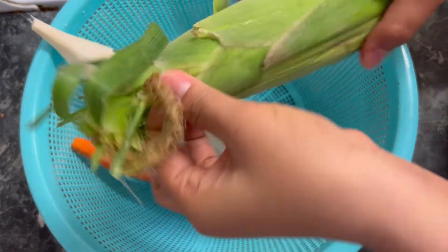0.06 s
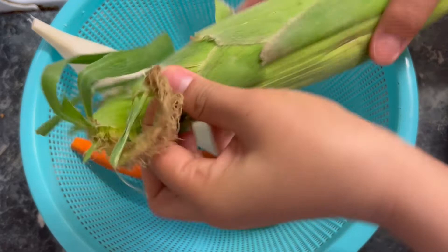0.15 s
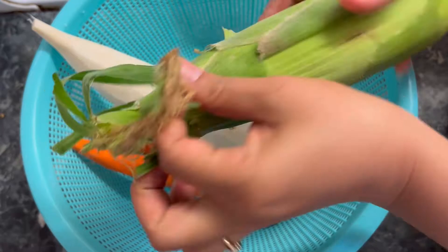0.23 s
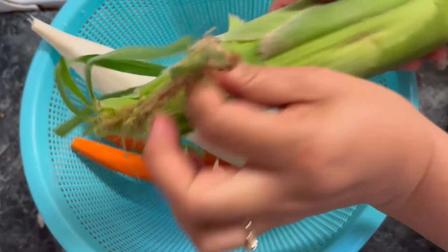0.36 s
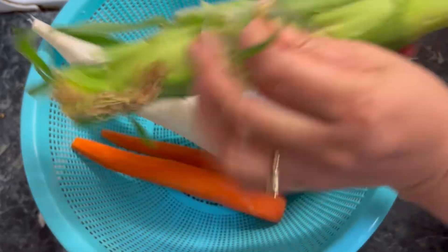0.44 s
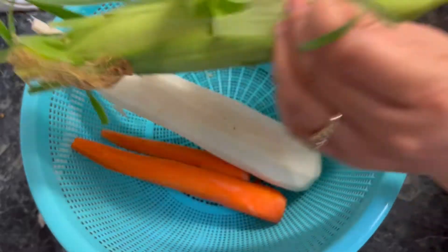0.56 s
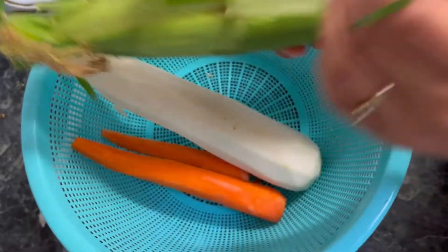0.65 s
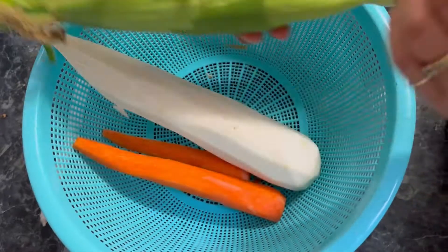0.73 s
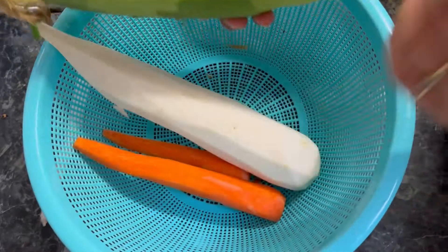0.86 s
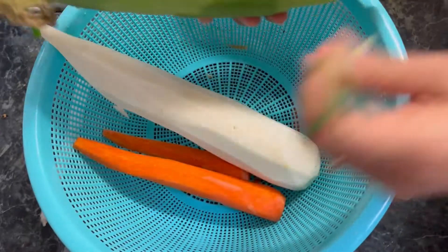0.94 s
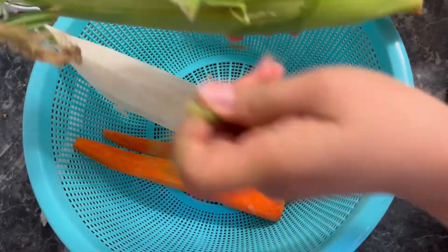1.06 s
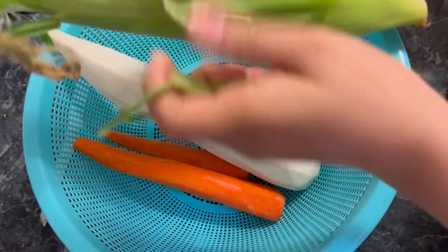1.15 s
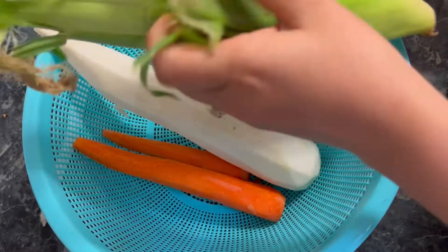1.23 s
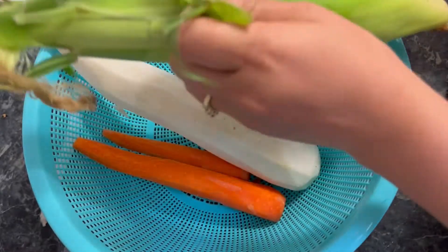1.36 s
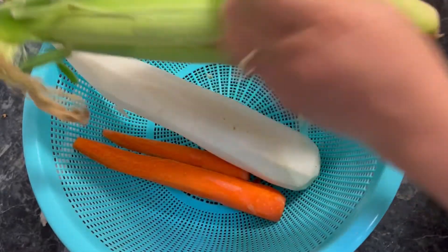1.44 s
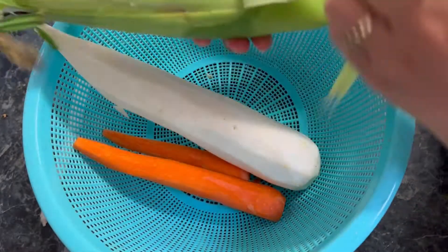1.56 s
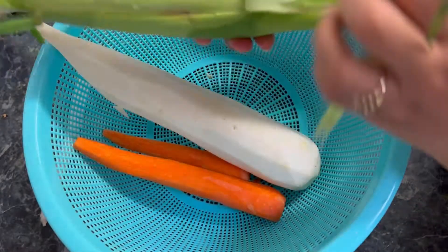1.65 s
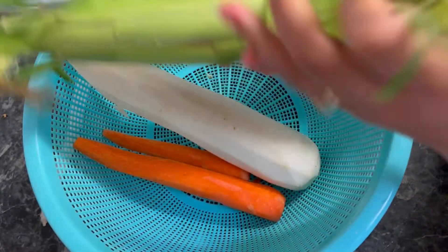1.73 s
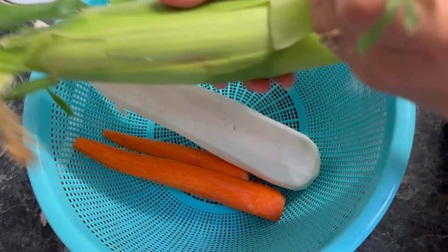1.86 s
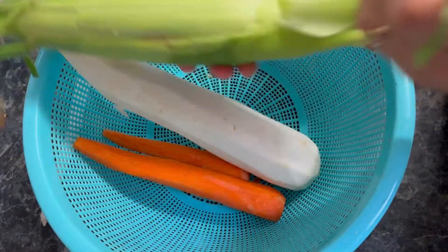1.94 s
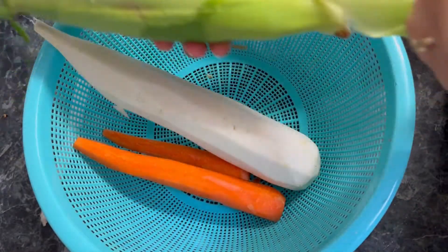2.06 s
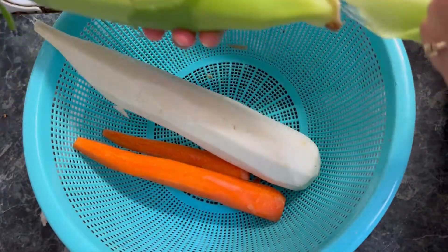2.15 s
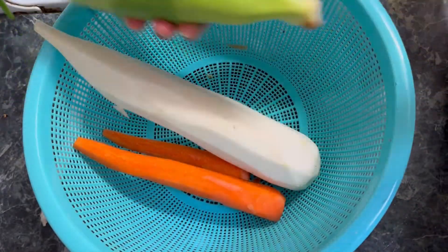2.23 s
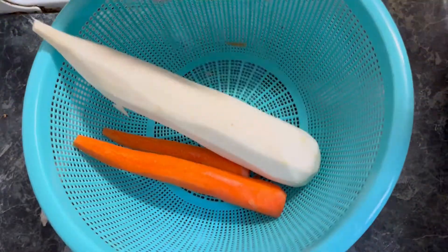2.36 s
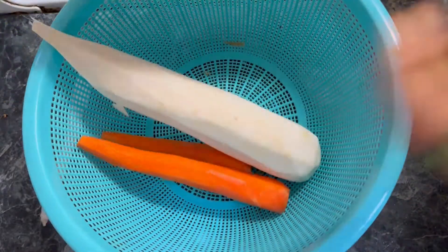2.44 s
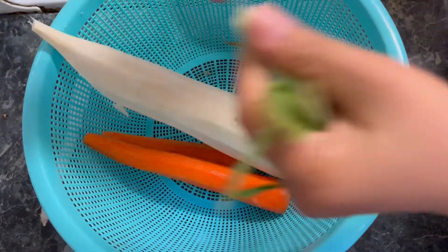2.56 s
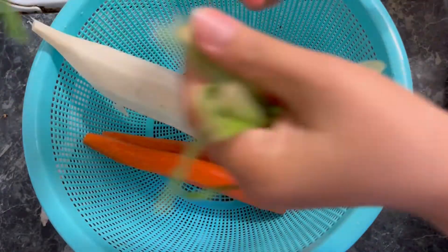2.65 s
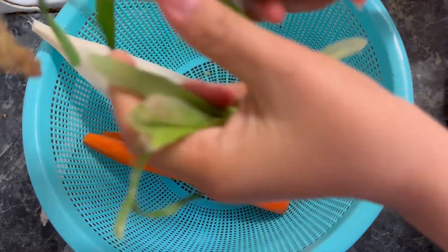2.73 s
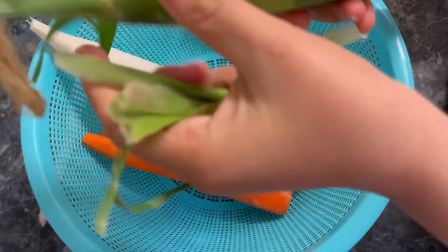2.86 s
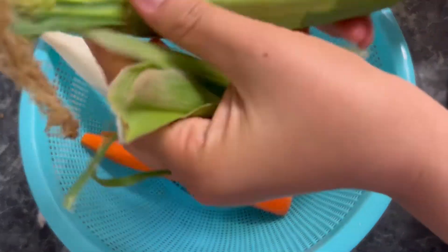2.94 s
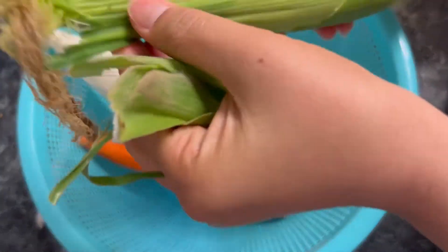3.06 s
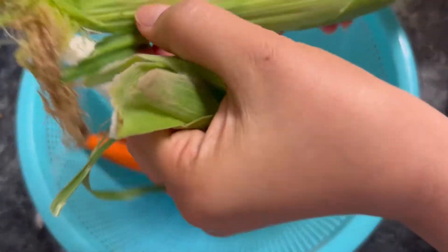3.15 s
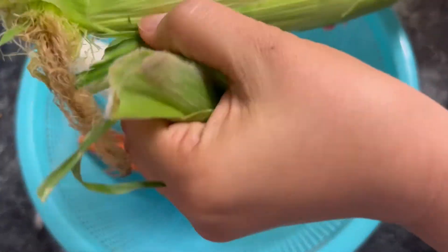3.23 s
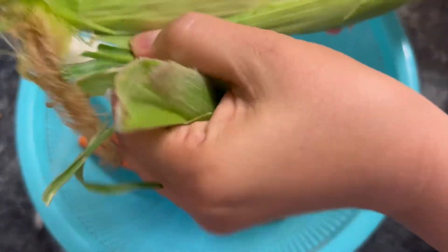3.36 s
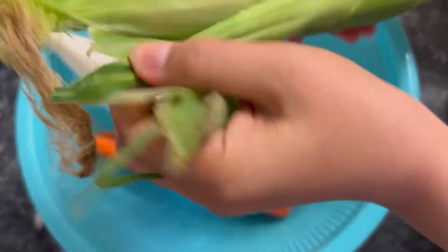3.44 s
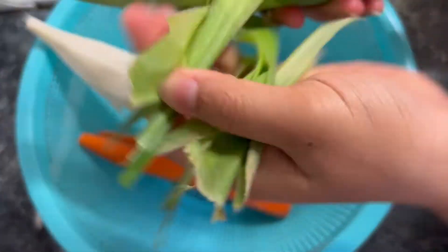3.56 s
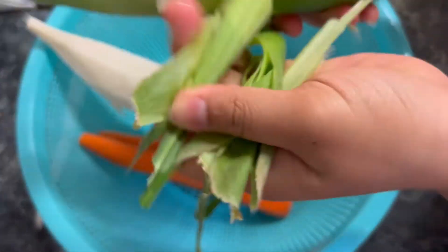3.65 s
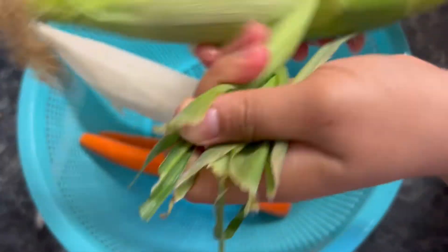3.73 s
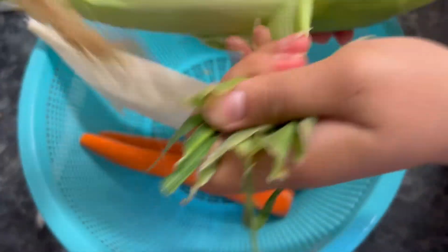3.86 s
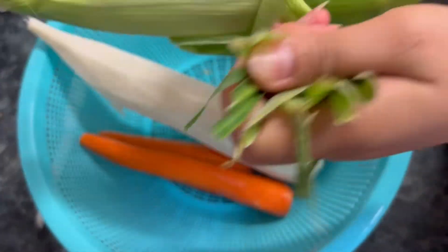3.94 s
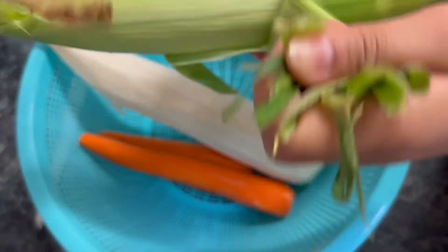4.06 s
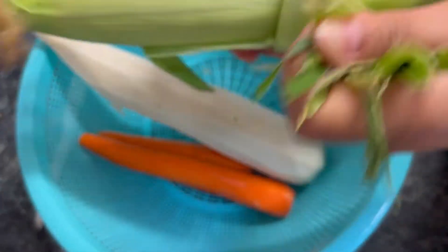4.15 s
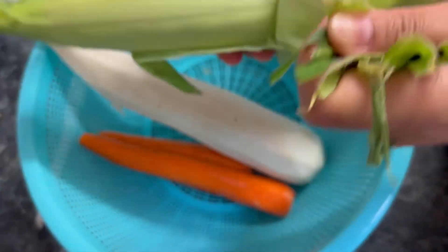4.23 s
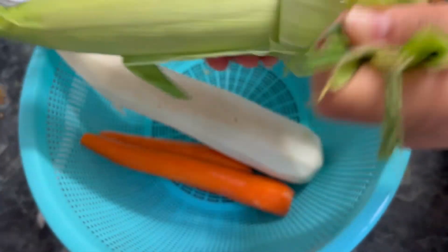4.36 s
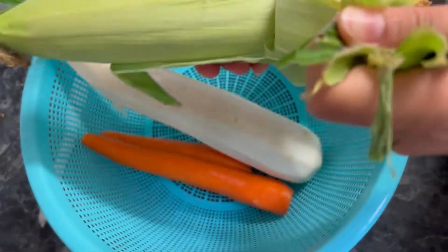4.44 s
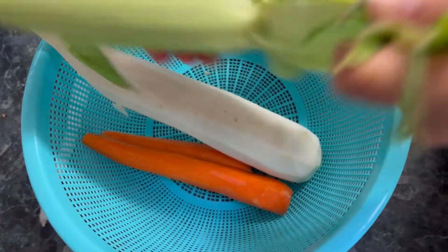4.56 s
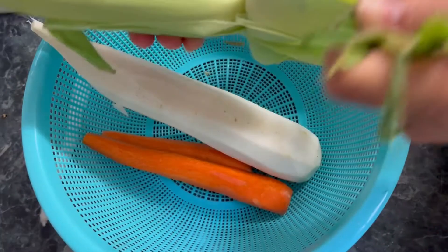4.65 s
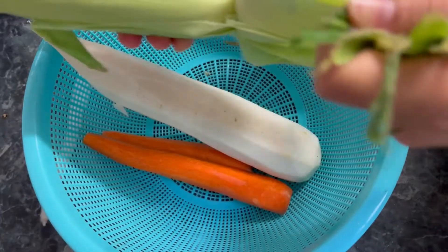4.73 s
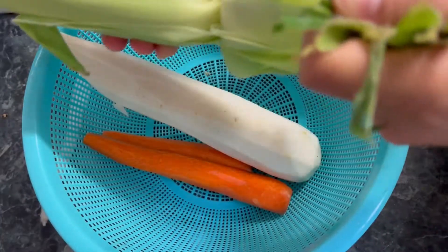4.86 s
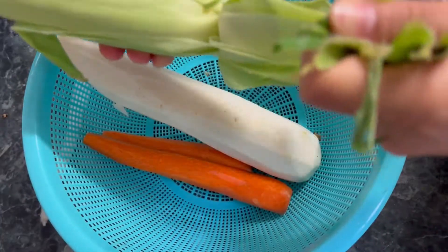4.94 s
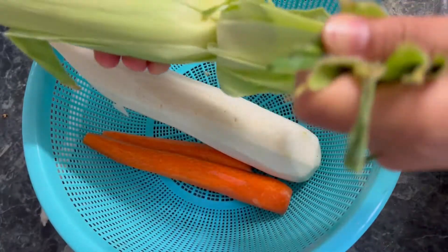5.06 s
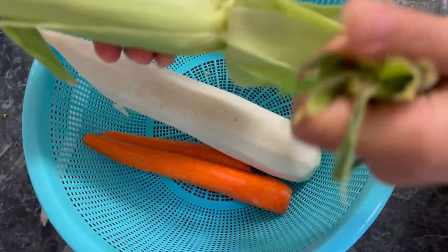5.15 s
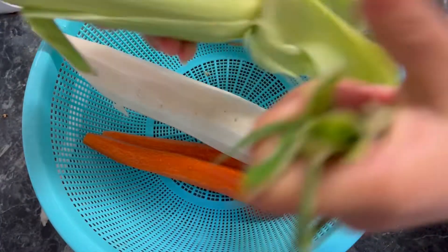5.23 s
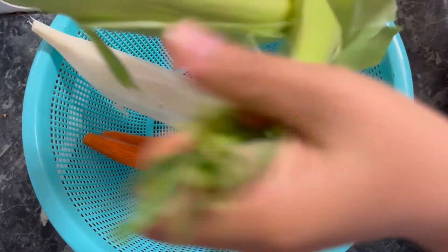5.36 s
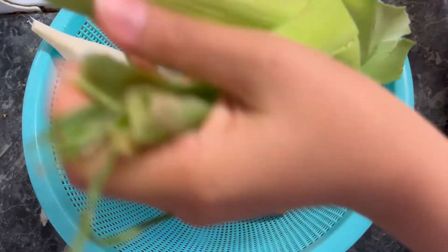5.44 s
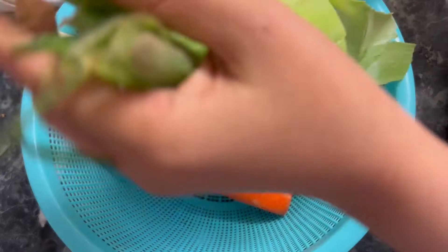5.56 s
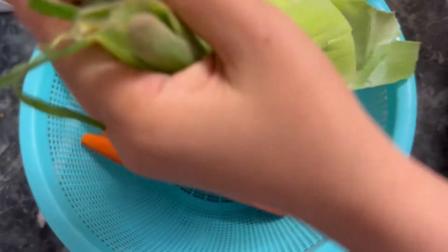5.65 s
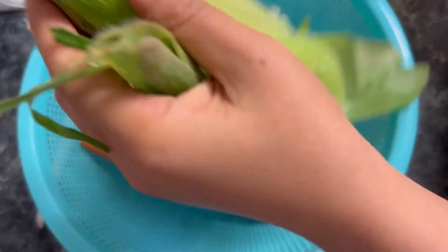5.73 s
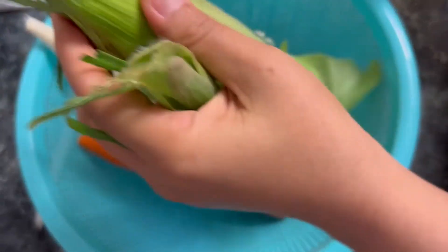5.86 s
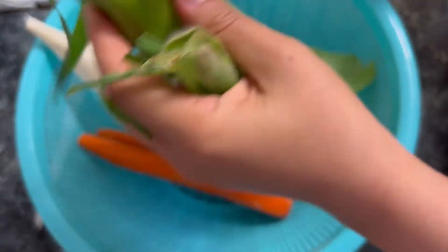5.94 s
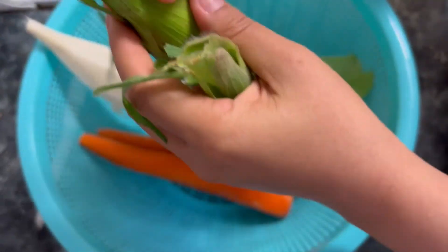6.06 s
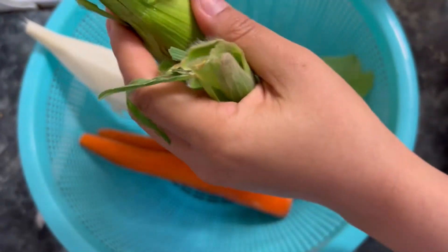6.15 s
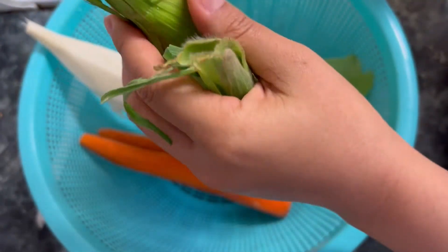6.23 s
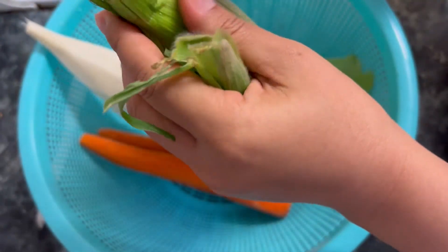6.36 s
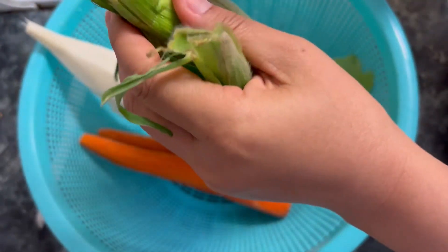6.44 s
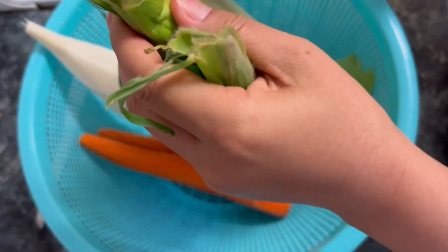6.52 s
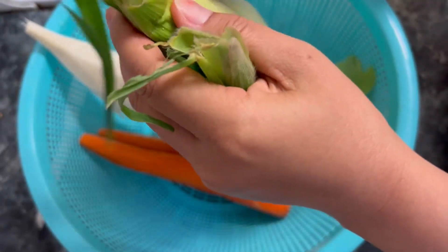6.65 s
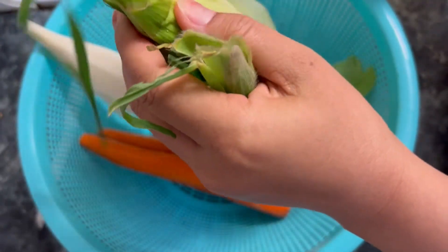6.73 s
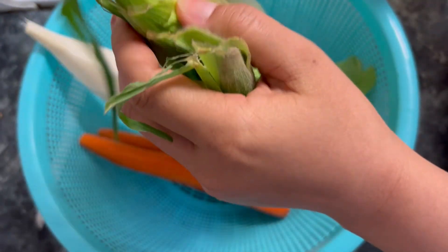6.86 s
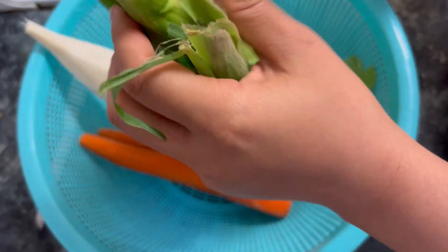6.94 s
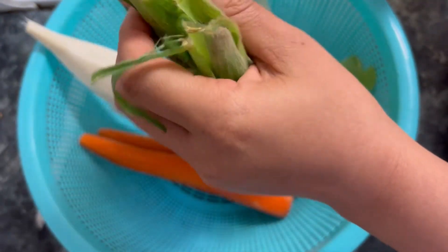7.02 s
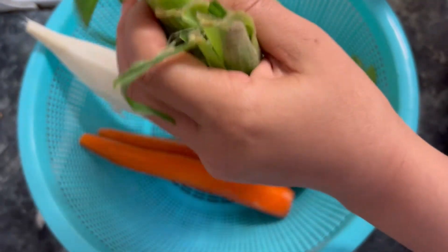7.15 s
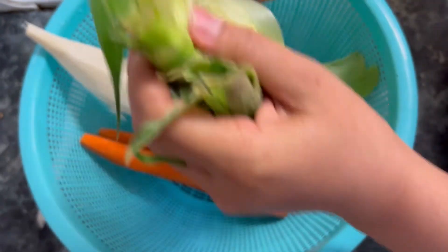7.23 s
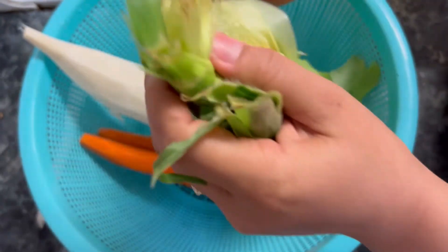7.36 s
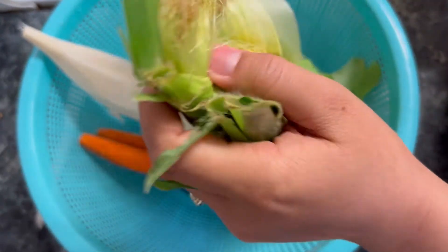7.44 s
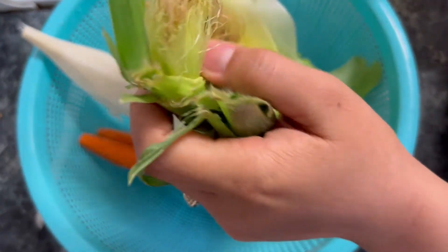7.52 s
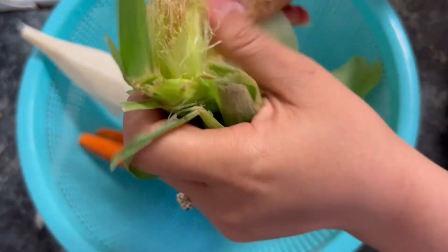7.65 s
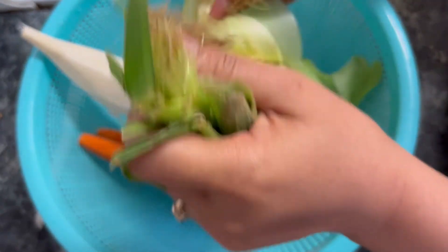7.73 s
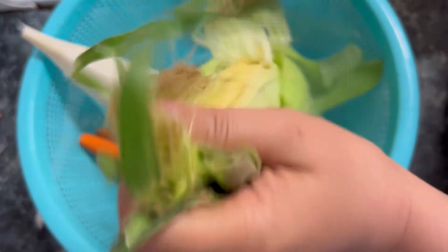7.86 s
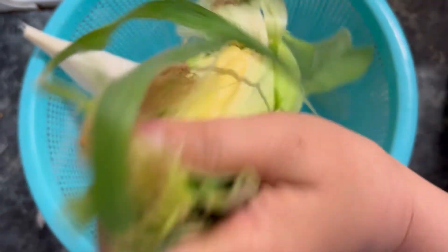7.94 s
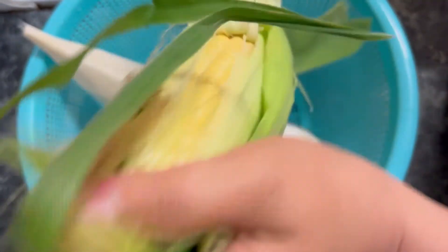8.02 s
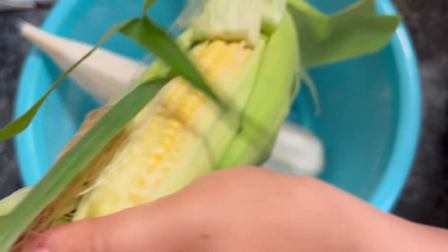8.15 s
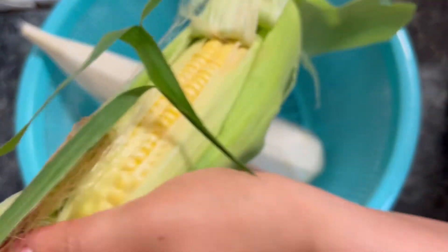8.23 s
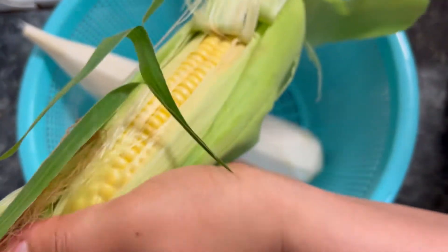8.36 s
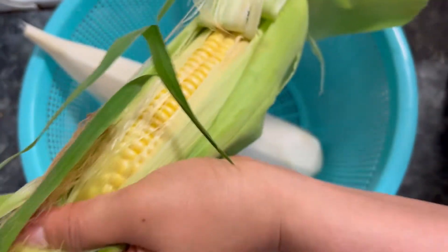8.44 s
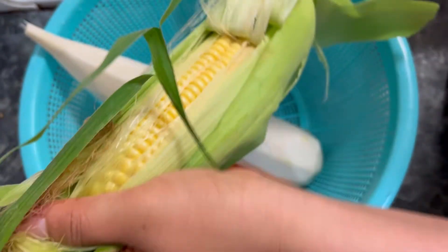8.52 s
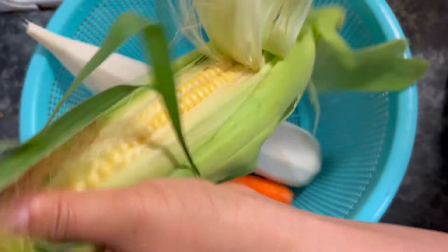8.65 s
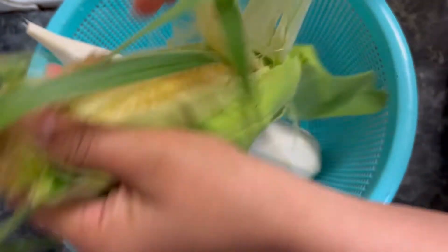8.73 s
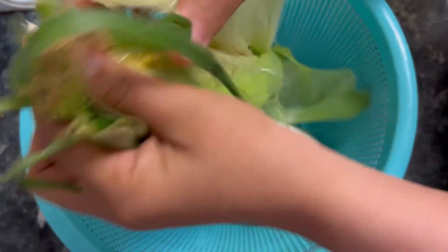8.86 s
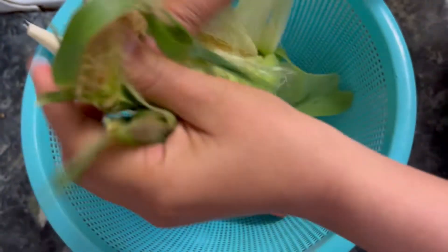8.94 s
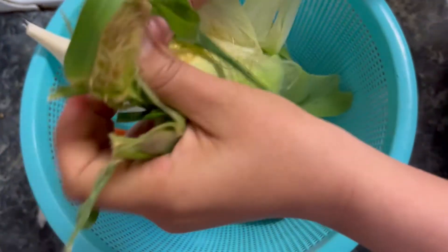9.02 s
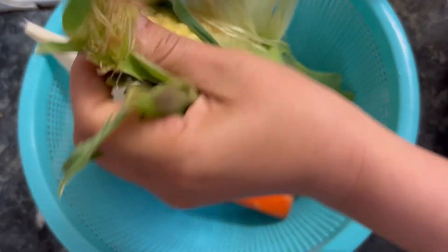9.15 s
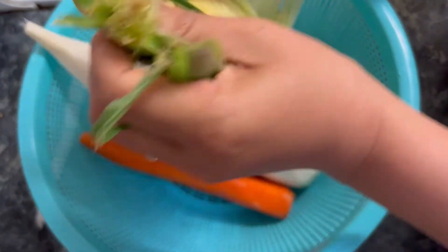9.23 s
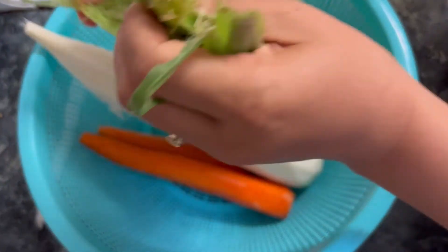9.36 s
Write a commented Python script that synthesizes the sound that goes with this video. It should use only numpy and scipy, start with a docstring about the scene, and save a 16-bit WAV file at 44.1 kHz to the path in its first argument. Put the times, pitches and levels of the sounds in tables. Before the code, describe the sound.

Irregular bursts of dry, crackling husk tearing and snapping leaf ribs, with quiet rustling between pulls and a few low plastic bumps in a small room.

```python
"""In a kitchen, hands peel the husks off a fresh ear of corn over a plastic colander, close to a two-port microphone.
Each pull tears a stream of tiny fibres, made of random noise bursts; thick ribs snap one by one as short broadband
cracks, and the cupped leaf answers with a hollow resonance. Folds pop, wet leaf creaks as it sticks and slips.
Now and then the colander is bumped and thuds: a sagging low tone, ringing modes and a noisy tap.
Echoes of a small room and a faint low rumble of filtered noise lie behind."""
import sys
import numpy as np
from scipy import signal
from scipy.fft import rfft, irfft
from scipy.io import wavfile
from scipy.ndimage import uniform_filter1d

SR = 44100
rng = np.random.default_rng(int(sys.argv[2]) if len(sys.argv) > 2 else 0)


def store_wav(level_fs):
    """Save 16-bit WAV to argv[1]."""
    pcm = np.round(np.clip(np.atleast_2d(level_fs), -1, 1) * 32767)
    wavfile.write(sys.argv[1], SR, pcm.T.astype(np.int16))


N = 414099
TIME = np.arange(N) / SR


def amp(db):
    """Decibels to gain."""
    return 10 ** (np.asarray(db) / 20)


def unit(x):
    """Scales to rms 1."""
    return x / np.sqrt(np.mean(x ** 2) + 1e-20)


def read(points, hz):
    """Reads a table on a log-frequency axis."""
    f, value = np.transpose(points)
    return np.interp(np.log(hz + 1), np.log(f + 1), value)


def add(mix, s, sound):
    """Adds a sound into the mix at time s."""
    part = mix[max(round(s * SR), 0):][:len(sound)]
    part += sound[:len(part)]


def wander(per_s):
    """Smooth random curve of rms 1 that takes so many new values a second."""
    knots = rng.standard_normal(N)
    return unit(np.interp(TIME * per_s, np.arange(N), knots))


def colour(x, points, size=16384):
    """Causal filter with the given relative spectrum; white noise keeps its power."""
    gain = amp(read(points, abs(np.fft.fftfreq(size, 1 / SR))))
    minimum_phase = np.exp(np.conj(signal.hilbert(np.log(gain))))
    taps = np.fft.ifft(minimum_phase).real[:size // 2]
    return signal.oaconvolve(x, taps / np.linalg.norm(taps))[:N]


def high_pass(x, hz):
    """Second-order bass cut."""
    return signal.sosfilt(signal.butter(2, hz, "highpass", fs=SR, output="sos"), x)


def resonate(x, hz, width):
    """A resonance, width in Hz, that follows the pitch curve hz; white noise keeps its power."""
    turn = np.exp(2j * np.pi * np.cumsum(hz) / SR)
    r = np.exp(-np.pi * width / SR)
    # shift the note down to 0 Hz, smooth it there, shift it back up
    smoothed = signal.lfilter([1], [1, -r], x / turn + 1e-18)
    return np.sqrt(2 * (1 - r * r)) * (turn * smoothed).imag


def background(level_db=-64):
    """Low steady rumble of the house with a trace of hiss: filtered noise -> common and unlike part."""
    # spectrum of the kitchen background: pitch_hz [Hz], relative_level_db [dB]
    floor = [(18, -33), (45, 2), (80, 5), (120, -1.5), (180, -12), (500, -21.5), (3000, -37),
             (16000, -41.5)]
    return amp(level_db) * np.array([colour(rng.standard_normal(N), floor) for part in range(2)])


def stroke(rise_s, hold_s, swell_db, sag_db_per_s, release_db_per_s):
    """One move of the hand, as a gain: it swells, sags while it lasts, then dies away."""
    t = TIME[:SR]
    swell = swell_db * np.minimum(t / max(rise_s, 1 / SR) - 1, 0)
    sag = sag_db_per_s * np.maximum(t - rise_s, 0)
    release = release_db_per_s * np.maximum(t - rise_s - hold_s, 0)
    return amp(swell - sag - release)


def handling(hold_db=-74.5, hold_hollow_db=-3):
    """Rips, rustles and leaves stirring in the held ear add up in power -> tearing level and hollowness, in dB."""
    # pulls that rip a strip of husk, except the first row, a brief click that opens the scene; hollow_db sets
    # the leaf's drive over the fibres': start_s [s], build_up_s [s], hold_s [s], level_db [dB], hollow_db [dB]
    rips = [(0.0, 0.0014, 0.0015, -34, -15), (0.377, 0.097, 0.058, -30, -12),
            (0.521, 0.025, 0.16, -39, 0.5), (1.331, 0.16, 0.047, -23, -8.5),
            (1.772, 0.03, 0.125, -22, -7.5), (1.908, 0.016, 0.17, -29, -2),
            (2.13, 0.033, 0.008, -29.5, -3.5), (3.371, 0.066, 0.011, -34.5, 5),
            (3.473, 0.022, 0.014, -35, -6), (3.748, 0.055, 0.097, -29.5, -3),
            (3.929, 0.027, 0.019, -35.5, -8), (4.031, .035, 0.1, -23.5, -4.5),
            (4.214, 0.084, 0.027, -26, -4.5), (4.461, 0.0087, 0.079, -20.5, -5),
            (4.765, 0.023, 0.13, -40, -8), (6.407, 0.039, 0.033, -42, -11.5),
            (6.571, 0.05, 0.046, -35, -5.5), (7.029, 0.089, 0.044, -29, -10.5),
            (7.175, 0.046, 0.016, -28, -5), (7.703, 0.056, 0.058, -31.5, -5.5),
            (8.05, 0.0045, 0.0144, -28, -6.5), (8.838, 0.022, 0.0071, -55.5, 15.5),
            (9.075, 0.085, 0.084, -36, -7), (9.213, 0.13, 0.038, -28.5, 0)]
    # fingers shifting their grip: start_s [s], length_s [s], level_db [dB], hollow_db [dB]
    rustles = [(0.042, 0.047, -57.5, -9), (0.131, 0.14, -55.5, -5.5), (0.29, 0.1, -50.5, -4),
               (1.041, 0.053, -67.5, -1), (1.169, 0.13, -58, 3.5), (1.572, 0.2, -51, -5.5),
               (2.22, 0.16, -57.5, 2), (2.427, 0.23, -61, -3), (2.81, .035, -64, -7),
               (2.873, 0.087, -65.5, -9), (3.221, .11, -52, -2), (3.616, 0.066, -52.5, 2.5),
               (4.429, .03, -35.5, -2.5), (4.603, 0.062, -55, -7), (4.702, 0.013, -50, -4.5),
               (5.044, 0.11, -48.5, -5.5), (5.239, 0.058, -51, 1.5), (5.343, 0.039, -53.5, -1.5),
               (5.46, 0.26, -66.5, 1.5), (5.672, 0.11, -54, -1), (5.825, 0.23, -65.5, 2),
               (6.153, 0.14, -73.5, -5.5), (6.794, 0.075, -58.5, -1.5), (6.94, .09, -56, -3),
               (7.337, 0.22, -58, 0.5), (7.593, 0.012, -52, 7.5), (7.688, 0.063, -46.5, 7.5),
               (7.863, 0.17, -60.5, -3.5), (8.177, 0.17, -59, -6.5), (8.451, 0.095, -53, -5.5),
               (8.607, 0.061, -53, -2.5), (8.712, 0.24, -54.5, 4), (9.023, 0.07, -55, -2)]
    moves = []
    for s, build, hold, level_db, hollow_db in rips:
        # swells as the pull builds, sags as the strip runs, dies when it comes free
        gain = stroke(build, hold, swell_db=18, sag_db_per_s=31.5, release_db_per_s=305)
        moves.append((s, gain, level_db, hollow_db))
    for s, length, level_db, hollow_db in rustles:
        # starts quickly and trails off
        gain = stroke(.01, length, swell_db=17, sag_db_per_s=6.5, release_db_per_s=197.5)
        moves.append((s, gain, level_db, hollow_db))
    fibre_power = np.full(N, amp(hold_db) ** 2)
    leaf_power = np.full(N, amp(hold_db + hold_hollow_db) ** 2)
    for s, gain, level_db, hollow_db in moves:
        add(fibre_power, s, (gain * amp(level_db)) ** 2)
        add(leaf_power, s, (gain * amp(level_db + hollow_db)) ** 2)
    return 10 * np.log10(fibre_power), 10 * np.log10(leaf_power / fibre_power)


def crackle(per_s, spread_db, ring_s):
    """Random breaks of uneven size, each a tiny decaying burst of noise; mean power about 1."""
    size = unit(amp(spread_db * np.minimum(rng.exponential(1, N), 3.5)))
    breaks = rng.random(N) < per_s / SR
    energy = size ** 2 * breaks * SR / per_s
    keep = np.exp(-2 / (ring_s * SR))
    envelope = np.sqrt(signal.lfilter([1 - keep], [1, -keep], energy))
    return envelope * rng.standard_normal(N)


def tearing(breaks_per_s=2800, rate_growth=.9, clump_db=1.5, sway_db=1.2,
            rub_db=-8, rub_growth=0.2, own_pops=1.0):
    """Clumped breaks merge into a stream under a hard pull; a light touch mostly rubs -> fibre and leaf drive."""
    level_db, hollow_db = handling()
    force_db = level_db + 28
    rate = np.clip(breaks_per_s * amp(rate_growth * force_db), 90, 14000)
    rub = amp(rub_db - rub_growth * force_db)
    clumps = unit(amp(clump_db * wander(per_s=260) + sway_db * wander(per_s=68)))
    fibres = crackle(rate, spread_db=4.0, ring_s=0.00036) + rub * rng.standard_normal(N)
    # the leaf also buckles as it comes free
    pops = crackle(rate / 4, spread_db=1.0, ring_s=0.00015) + rub * rng.standard_normal(N)
    leaf = (fibres + own_pops * pops) / np.hypot(1, own_pops)
    strength = clumps * amp(level_db) / np.hypot(1, rub)
    return strength * np.array([fibres, leaf * amp(hollow_db)])


def popping(cycles=2.8, breadth=1.52, click_db=-17):
    """A fold flips over and rings for a few cycles around its note: decaying noise in a narrow band."""
    # folds of leaf popping over: start_s [s], level_db [dB], pitch_hz [Hz]
    folds = [(.087, -51, 4800), (0.155, -48, 4400), (.164, -45, 4470), (.179, -48, 4470),
             (.233, -43.5, 4530), (0.5608, -37.5, 970), (3.309, -50, 2010), (3.606, -54, 1170),
             (4.624, -43.5, 3230), (5.09, -42.5, 3100), (5.251, -53, 3000), (5.35, -55, 2600),
             (5.375, -55, 2730), (5.393, -56, 2240), (5.49, -53.5, 2200), (5.621, -65, 1690),
             (5.695, -50, 2730), (6.371, -55, 7100), (8.256, -43.5, 1670), (9.343, -26, 1430),
             (9.368, -23.5, 1660)]
    out, t = np.zeros(N), TIME[:1024]
    for s, level_db, hz in folds:
        kick = rng.standard_normal(len(t)) * np.exp(-t * hz / cycles)
        band = signal.butter(2, [hz / breadth, hz * breadth], "bandpass", fs=SR, output="sos")
        note = unit(signal.sosfilt(band, kick))
        add(out, s, amp(level_db) * (note + amp(click_db) * unit(kick)))
    return out


def creaking(width=270, overtone=2.33, overtone_width=650, swell_db=8):
    """Stick and slip: an uneven train of jerks swells, eases off, and rings two modes of the leaf."""
    # wet leaf sticking and slipping on the ear; rate and pitch are centres that drift:
    # start_s [s], end_s [s], slips_per_s [1/s], level_db [dB], pitch_hz [Hz], overtone_db [dB]
    creaks = [(0.263, 0.288, 245, -54.5, 540, -12), (1.446, 1.51, 210, -33.5, 1160, -17),
              (1.847, 1.964, 77, -27, 1135, -32), (2.005, 2.082, 128, -42.5, 1140, 5.5),
              (2.085, 2.189, 92, -40.5, 1230, -20), (3.406, 3.436, 220, -34.5, 810, -16),
              (7.078, 7.181, 210, -38.5, 1870, -6), (7.333, 7.42, 127, -53.5, 1490, -9),
              (7.419, 7.513, 73, -55.5, 1510, 3)]
    out, drift = np.zeros(N), 1 + .045 * wander(per_s=70)
    for start, end, rate, level_db, hz, overtone_db in creaks:
        pace = drift[round(start * SR):round(end * SR)]
        slips = np.diff(np.floor(np.cumsum(rate * pace) / SR + .5), prepend=0)
        pressure = np.sin(np.pi * np.linspace(0, 1, len(pace)) ** np.sqrt(2))
        jerks = unit(slips * amp(swell_db * pressure + rng.standard_normal(len(pace))))
        jerks = np.pad(jerks, (0, 600))  # room to ring out
        note = hz * np.pad(abs(pace) ** .5, (0, 600), "edge")
        low_mode = resonate(jerks, note, width)
        high_mode = resonate(jerks, overtone * note, overtone_width)
        add(out, start, amp(level_db) * (low_mode - amp(overtone_db) * high_mode))
    return out


def bumps(push_s=0.0059, sag=2.5, sag_s=0.0048, tap_db=-34):
    """A soft blow whose pitch sags as the contact spreads, then the colander's modes, with a noisy tap."""
    # bumps on the colander: start_s [s], level_db [dB], settled_pitch_hz [Hz]
    blows = [(.318, -51, 191), (0.584, -40, 85), (2.266, -31, 112), (2.342, -15, 104.2),
             (2.389, -31, 110.7), (5.767, -21.5, 70.6), (5.845, -36, 93), (6.062, -45, 85.6),
             (6.97, -50, 90), (7.873, -32.5, 108), (8.467, -46, 85.5), (8.517, -36.5, 117)]
    # modes the colander rings with: pitch_hz [Hz], level_db [dB], t60_s [s to fall 60 dB]
    colander = [(80, -14, 0.15), (129, -11, 0.27), (212, -23, 0.2), (250, -20, 0.19), (366, -35, 0.17)]
    out, t = np.zeros(N), TIME[:SR // 2]
    for s, level_db, hz in blows:
        turns = np.cumsum(hz * (1 + sag * np.exp(-t / sag_s))) / SR
        push = (t / push_s * np.exp(1 - t / push_s)) ** 2 * np.sin(2 * np.pi * turns)
        ring = sum(amp(db - 60 * t / t60) * np.sin(2 * np.pi * f * t) for f, db, t60 in colander)
        ring = ring * (1 - np.exp(-t / push_s))
        dull_noise = unit(signal.lfilter([1], [1, -.93], rng.standard_normal(len(t))))
        tap = amp(tap_db) * dull_noise * np.exp(-t / .012)
        add(out, s, amp(level_db) * (push + ring + tap))
    return out


def snapping(rise_s=0.00014, fall_s=0.00037, splinter_db=-19, splinter_s=0.0057, span_s=0.0049, thinning=0.21):
    """A rib gives way within a millisecond and splinters for a few more -> drive of fibre and of leaf."""
    # ribs snapping and leaves slipping; the row at 2.341 s is the sharp tap of the colander bump: start_s [s],
    # level_db [dB], hollow_db [dB, leaf over fibre]
    snaps = [(0.439, -18.5, -14), (0.5557, -27.5, -18), (0.7221, -38.5, 0), (0.734, -34, -32),
             (1.262, -41, 2.5), (1.3212, -39, -18), (1.569, -32.5, -20), (1.6318, -30, -8),
             (1.6565, -32, -6), (1.6946, -32.5, -6.5), (1.788, -31, -3), (2.1797, -26, 5.5),
             (2.2109, -27.5, -19), (2.341, -34.5, 0), (3.4893, -20.5, -4.5), (3.6712, -34.5, 0),
             (3.8014, -36, -12), (3.8161, -20, -30), (3.875, -21.5, -5), (4.0384, -26.5, -20),
             (4.055, -16, -20), (4.1131, -18.5, 1), (4.1669, -23, 3), (4.2182, -26, -31), (4.261, -24, -26),
             (4.2853, -13.5, -0.5), (4.3634, -28, -3), (4.469, -25.5, 2), (4.518, -15, -1.5),
             (4.544, -15.5, -27), (4.725, -31.5, -11), (4.748, -29.5, -1), (4.7556, -25, 0.5),
             (4.768, -22, -23.5), (4.777, -24, -5), (4.802, -30.5, -3), (4.8146, -28, -0.5),
             (4.824, -31.5, -3), (4.84, -28.5, 0.5), (4.861, -20.5, -22.5), (4.869, -24, -0.5),
             (4.8894, -26.5, -1), (4.9034, -26, -2.5), (4.954, -28.5, -1), (5.7604, -37.5, 10),
             (6.6323, -30.5, 1.5), (6.665, -28, -4.5), (7.202, -18.5, -15), (7.2323, -22, -22),
             (7.7683, -18, -3), (7.786, -18.5, -7.5), (7.8076, -19.5, -0.5), (8.0524, -22, -11),
             (8.258, -42, -18), (8.3531, -41.5, -14), (8.445, -48, -5), (9.1616, -22, 0.5),
             (9.27, -23, -7.5), (9.367, -18.5, -2)]
    fibre, leaf, t = np.zeros(N), np.zeros(N), TIME[:1024]
    decay = np.exp(-t / fall_s) + amp(splinter_db) * np.exp(-t / splinter_s)
    shape = (1 - np.exp(-t / rise_s)) ** 2 * decay
    bass = np.fft.rfftfreq(len(t), 1 / SR) < 800
    for s, level_db, hollow_db in snaps:
        spectrum = rfft(rng.standard_normal(len(t)) * shape)
        spectrum /= np.sqrt(uniform_filter1d(abs(spectrum) ** 2, size=90))  # every snap is broadband
        spectrum *= amp(bass * np.clip(thinning * (level_db + 14), -10, 0))  # but thin ribs give less bass
        burst = irfft(spectrum)[:len(t) // 2] * np.sqrt(span_s * SR) * amp(level_db)
        add(fibre, s, burst)
        add(leaf, s, burst * amp(hollow_db))
    return np.array([fibre, leaf])


def husk(crisp_db=-4.0, flex_db=-3, cup_db=-17.0, cup_width=380, bending=0.045):
    """Breaks are heard directly, with a crisp edge, and through the flexing, cupped leaf."""
    # the leaf in hand; dry outer leaves are crisper: time_s [s], cup_pitch_hz [Hz], crispness_db [dB]
    cup = [(0, 1210, 2.5), (0.597, 1230, 7), (1.95, 1142, -4.5), (5, 1191, -3.5), (6.599, 1784, 1),
           (7.8, 1740, 1), (8.4, 1300, -1.5), (9.35, 1480, -3.5)]
    # spectrum of a breaking fibre: pitch_hz [Hz], relative_level_db [dB]
    fibre_spectrum = [(110, -10.5), (350, -20), (550, -14.5), (800, -13.5), (1500, 1.5), (2200, 3),
                      (3000, 4.5), (4500, 3), (6500, 2), (8800, 1.5), (11500, 2.5), (14000, -1.5),
                      (15800, -3)]
    # spectrum of the whole leaf flexing: pitch_hz [Hz], relative_level_db [dB]
    flex_spectrum = [(150, -11.5), (380, -5), (600, -4), (790, -7), (1080, 0.5), (1600, -1), (2600, -3),
                     (9000, -22.5)]
    # spectrum of a crisp crack: pitch_hz [Hz], relative_level_db [dB]
    crisp_spectrum = [(2000, -37.5), (3800, -10.5), (5500, -1.5), (8500, 6), (15800, -8)]
    fibre, leaf = tearing() + snapping()
    s, hz, crispness_db = np.transpose(cup)
    note = np.interp(TIME, s, hz) * (1 + bending * wander(per_s=22))  # the note shifts as the leaf bends
    hollow = high_pass(amp(cup_db) * resonate(leaf, note, cup_width) + creaking(), hz=836)
    skin = fibre * rng.choice([-1, 1], N)  # the dry skin shatters along with each break
    edge = amp(crisp_db + np.interp(TIME, s, crispness_db)) * colour(skin, crisp_spectrum)
    body = colour(fibre, fibre_spectrum) + amp(flex_db) * colour(leaf, flex_spectrum)
    return high_pass(body, hz=128) + edge + hollow + popping()  # a thin leaf radiates little bass


def echo_pattern(near_db, near_s, room_db):
    """Quick echoes from hands, bowl and counter, then the room's tail -> common and unlike part."""
    # reverberation of the room: pitch_hz [Hz], t60_s [s to fall 60 dB]
    room_t60 = [(80, 0.63), (200, 0.41), (600, 0.17), (7000, 0.23), (15000, 0.07)]
    t = TIME[:SR // 3]
    taps = rng.standard_normal((2, len(t)))
    near = taps[:, ::-1] * np.exp(-t / near_s) * (t > .0007)
    hz, when, z = signal.stft(taps * (1 - np.exp(-t / .008)), SR, nperseg=256)
    decay = amp(-60 * when / read(room_t60, hz)[:, None])  # each band dies at its own pace
    tail = signal.istft(z * decay, SR, nperseg=256)[1][:, :len(t)]
    near = near / np.linalg.norm(near, axis=1, keepdims=True)
    tail = tail / np.linalg.norm(tail, axis=1, keepdims=True)
    return amp(near_db) * near + amp(room_db) * tail


def kitchen(x, near_db, near_s, room_db, size=1536, count=29):
    """The hands keep moving, so short overlapping stretches take turns through echo patterns -> common, unlike."""
    patterns = [echo_pattern(near_db, near_s, room_db) for k in range(count)]
    common, unlike = x.copy(), np.zeros(N)
    window = signal.windows.cosine(2 * size)
    for k, i in enumerate(range(0, N, size)):
        piece = x[i:i + 2 * size]
        faded = piece * window[:len(piece)]
        echoes = signal.fftconvolve(faded[None], patterns[k % count], axes=1)
        add(common, i / SR, echoes[0])
        add(unlike, i / SR, echoes[1])
    return np.array([common, unlike])


def scene():
    """Husk and colander in the kitchen -> left and right."""
    # how far the sound differs between the ports: pitch_hz [Hz], unlike_gain_db [dB]
    unlike_gain = [(60, -18), (250, -7), (550, 1.5), (1200, -3), (6000, 0), (8500, -24.5), (16000, -21.5)]
    peel = kitchen(husk(), near_db=-3.0, near_s=0.0033, room_db=-15.5)
    thuds = kitchen(bumps(), near_db=-15.5, near_s=0.016, room_db=-16.0)
    common, unlike = amp(-1.5) * peel + thuds + background()
    unlike = irfft(rfft(unlike) * amp(read(unlike_gain, np.fft.rfftfreq(N, 1 / SR))), N)
    return np.array([common + unlike, common - unlike])


def record(dry, lag_hz=8450, turn_hz=3550, edge_hz=15900):
    """Two close ports with a phase lag that grows through the treble; soft overload; then the band limit."""
    # the port pair: pitch_hz [Hz], left_over_right_db [dB], left_lead_rad [rad, before the treble lag]
    port_pair = [(100, 3, .1), (1300, 3, 0.066), (2160, 2.5, -1.5), (3280, 2, 1.14), (5370, 5, -0.19),
                 (7100, 3.5, -1.59), (7200, 6.5, 1.4), (7800, 0, -0.1)]
    hz = np.fft.rfftfreq(N, 1 / SR)
    f, *columns = np.transpose(port_pair)
    balance_db, lead = (np.interp(hz, f, c) for c in columns)
    lead = lead - 2 * np.pi * np.maximum(hz - lag_hz, 0) / turn_hz  # one turn more per turn_hz above lag_hz
    left = amp(balance_db / 2)
    right = amp(-balance_db / 2) * np.exp(-1j * lead)
    ports = irfft(rfft(dry) * np.array([left, right]), N)
    ports = ports / (1 + (ports / .85) ** 4) ** .25
    band_limit = signal.firwin(255, edge_hz, window=("kaiser", 8), fs=SR)
    return signal.oaconvolve(ports, band_limit[None], "same")


dry = scene()
out = record(dry)
store_wav(out)
```